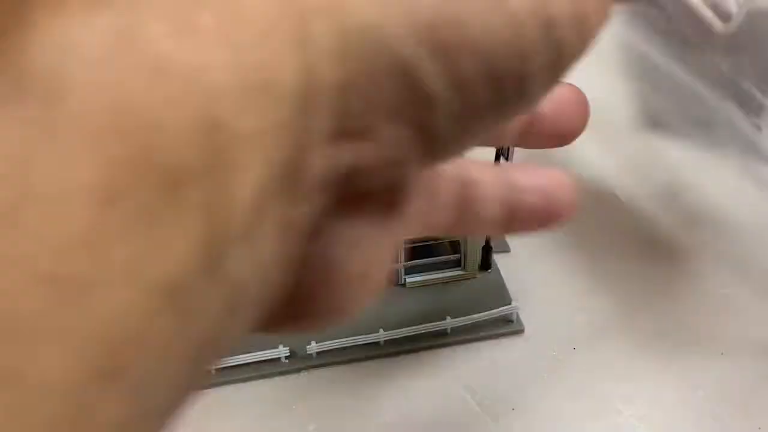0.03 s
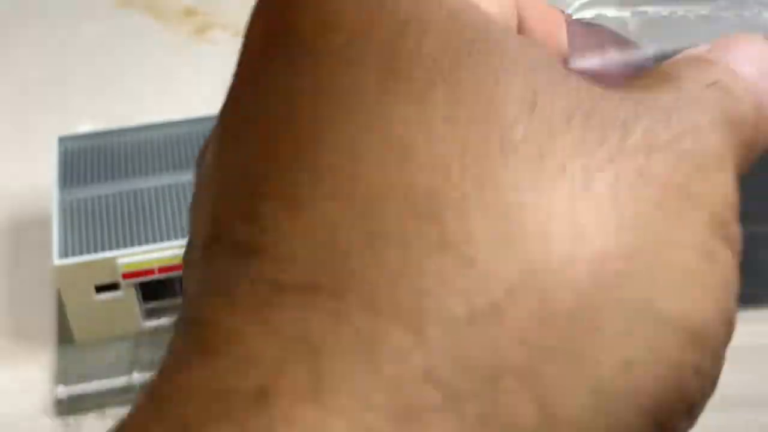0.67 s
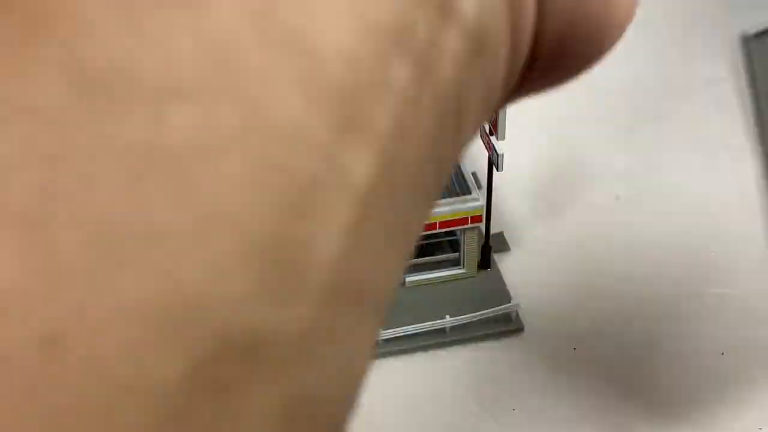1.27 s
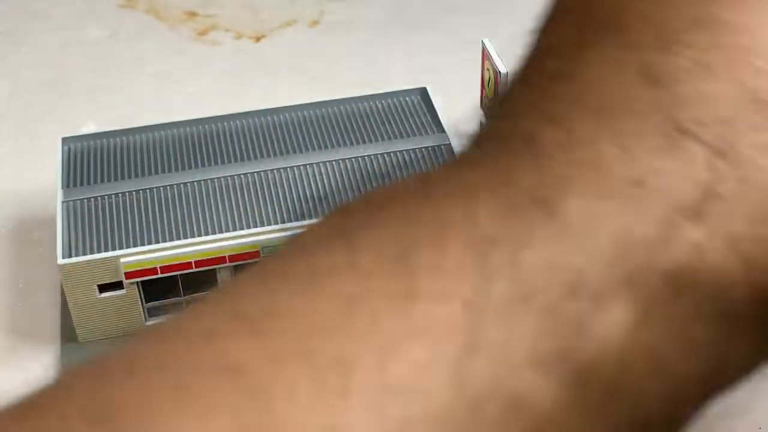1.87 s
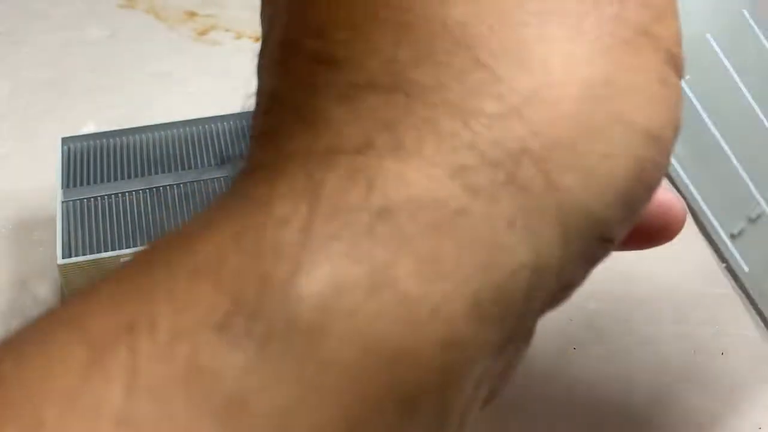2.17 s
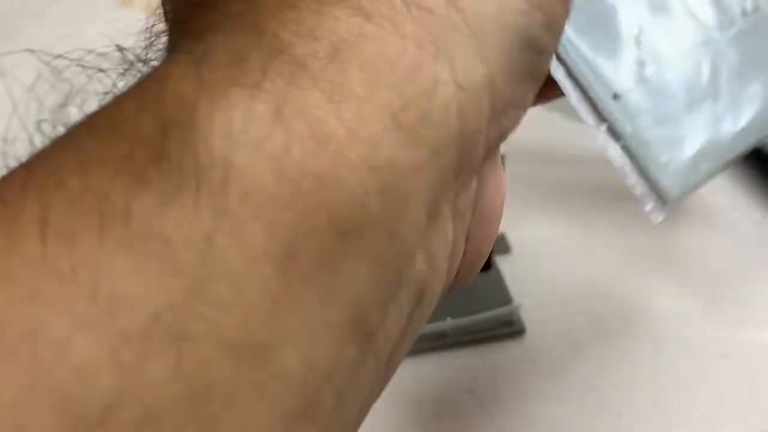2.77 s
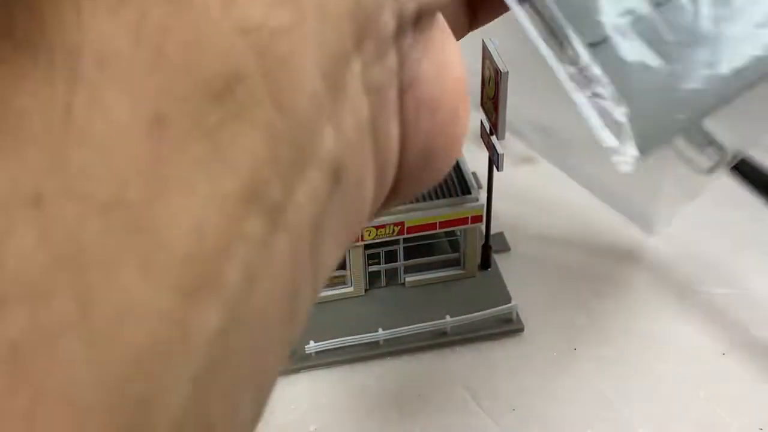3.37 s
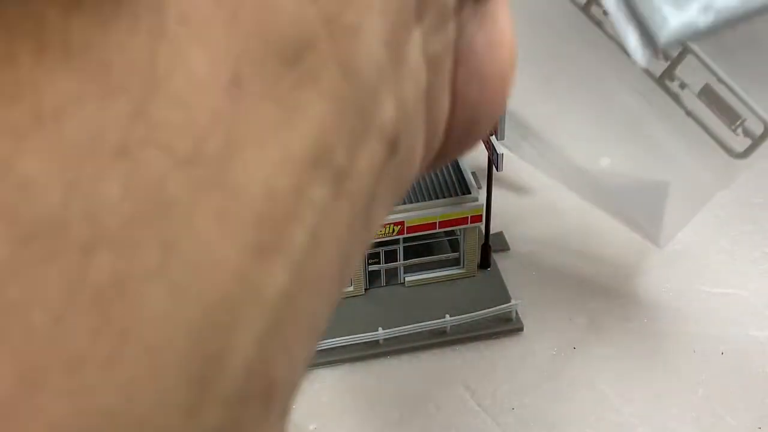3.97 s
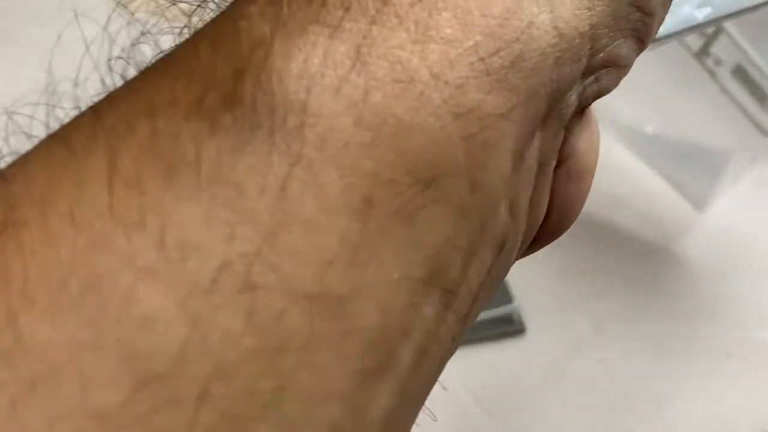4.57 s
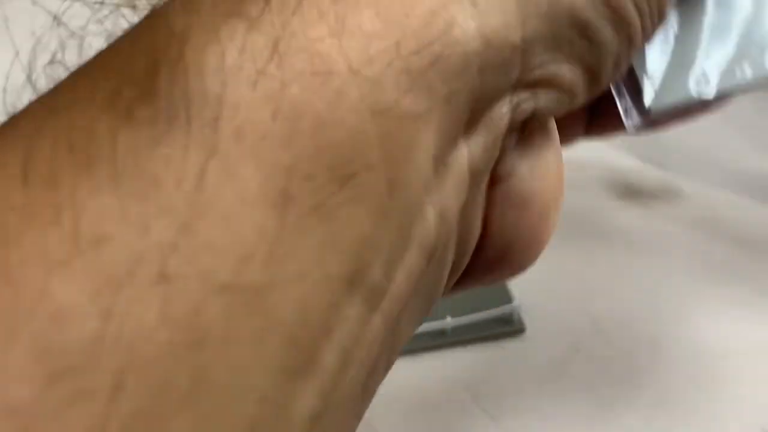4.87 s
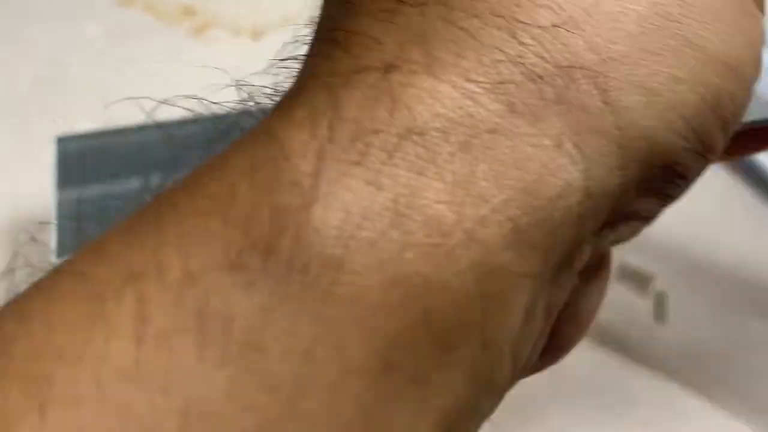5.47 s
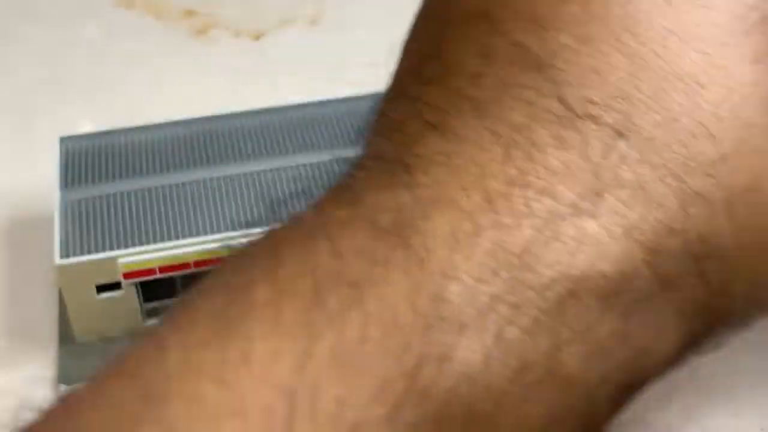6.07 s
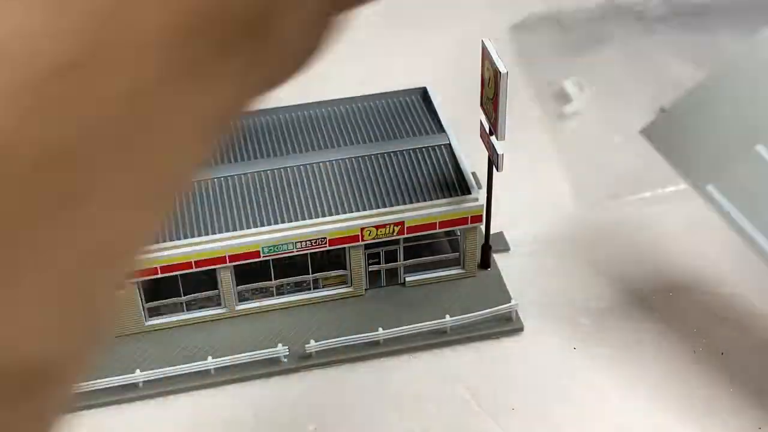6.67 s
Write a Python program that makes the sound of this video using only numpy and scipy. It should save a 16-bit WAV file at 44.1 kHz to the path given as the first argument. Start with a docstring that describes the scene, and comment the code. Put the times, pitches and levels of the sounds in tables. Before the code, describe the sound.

Thin plastic bags crinkle and snap in a hand, small parts tapping inside, with a few dull bumps against the microphone stand.

```python
"""Thin plastic bags of model parts rustle and snap as a hand lifts, turns and puts them down.
Creases flip in the film; the parts inside slide, tap each other and thud on the table.
The arm bumps and rubs a camera stand, which carries dull knocks straight to the microphones,
and something small clinks. A small, quiet room surrounds it."""
import sys
import numpy as np
from scipy import signal
from scipy.fft import rfft, irfft, next_fast_len
from scipy.io import wavfile
from scipy.ndimage import uniform_filter1d, minimum_filter1d, map_coordinates

SR = 44100
rng = np.random.default_rng(int(sys.argv[2]) if len(sys.argv) > 2 else 0)


def master(y):
    """Save y as 16-bit WAV."""
    cut = np.clip(np.atleast_2d(y).T, -1, 1)
    pcm = np.round(cut * 32767)  # scale
    wavfile.write(sys.argv[1], SR, pcm.astype(np.int16))


N = 297234

# distinct snaps of the film (time [s], level [dB], crease pitch [Hz])
SNAP_EVENTS = [(0.154, -26.5, 5430), (0.398, -42, 2560), (0.5601, -29, 4600), (0.609, -28, 3600),
               (0.7545, -30, 2820), (0.832, -18.5, 11400), (0.8987, -17.5, 3330), (0.9935, -30.5, 3560),
               (1.0317, -27.5, 3420), (1.1074, -27.5, 16000), (1.1727, -14, 5100), (1.3748, -27.5, 4080),
               (1.4845, -29, 3400), (1.511, -22.5, 3950), (1.657, -12.5, 10400), (1.6933, -24.5, 11100),
               (1.767, -32, 4330), (1.8723, -23.5, 3630), (1.8886, -15.5, 5440), (1.9995, -19.5, 3770),
               (2.0577, -16.5, 15400), (2.4977, -16.5, 8050), (2.6226, -19, 4500), (3.5063, -26.5, 15070),
               (3.6284, -32, 3940), (3.9544, -45.5, 4380), (4.2034, -36.5, 4110), (4.7486, -24, 15180),
               (5.0511, -22.5, 3620), (5.1447, -17, 10600), (5.1935, -22.5, 9100), (5.257, -17, 2900),
               (5.4811, -19.5, 15200), (5.8851, -11.5, 11500), (5.9322, -12.5, 11100), (5.9704, -21, 10500),
               (6.0427, -22, 7010), (6.2123, -9.5, 6450), (6.2836, -17, 11500), (6.3421, -15.5, 15300),
               (6.359, -13.5, 15700), (6.389, -11.5, 2920), (6.4824, -19, 11800), (6.5717, -32, 15100)]
# finger strokes on the bag (start [s], end [s], film crinkle [dB], sliding parts [dB])
FINGER_STROKES = [(0, 0.057, -45.5, -45), (0.151, 0.24, -53.5, -52), (0.516, 0.608, -54.5, -47),
                  (0.672, 0.71, -50, -56.5), (0.755, 0.88, -51, -53), (0.888, 1.03, -50, -51.5),
                  (1.14, 1.213, -50.5, -60), (1.253, 1.367, -47, -56), (1.628, 1.711, -57, -56),
                  (1.824, 1.882, -40, -53), (2.205, 2.254, -51.5, -53.5), (2.321, 2.391, -61, -52.5),
                  (2.4, 2.458, -48, -49), (2.505, 2.728, -56.5, -51), (2.83, 2.9, -45.5, -43),
                  (2.985, 3.15, -51, -50.5), (3.17, 3.24, -54, -52), (3.306, 3.311, -45.5, -43.5),
                  (3.437, 3.587, -59.5, -59.5), (4.098, 4.29, -63, -67.5), (4.286, 4.341, -47.5, -59),
                  (4.722, 4.84, -47.5, -55.5), (4.912, 5.017, -41, -47), (5.251, 5.3, -39, -46),
                  (5.358, 5.519, -44.5, -49), (5.58, 5.843, -54.5, -56), (5.888, 5.981, -48.5, -65),
                  (6.024, 6.134, -44.5, -49.5), (6.163, 6.31, -38.5, -54.5), (6.332, 6.447, -33.5, -44.5),
                  (6.585, 6.734, -56.5, -53.5)]
# spectrum of the wide film (frequency [Hz], level [dB])
FILM_SPECTRUM = [(60, -20.5), (300, -6.5), (700, 0.5), (900, -4), (1300, 3), (1700, -6), (2200, -5),
                 (3000, -6), (5000, -12.5), (16000, -47.5)]


def amp(db):
    """Decibels to gain."""
    return np.exp(np.asarray(db) * (np.log(10) / 20))


def unit(x):
    """Scale to rms 1."""
    return x / np.sqrt(np.mean(x ** 2) + 1e-20)


def along(points, hz):
    """Interpolate (Hz, value) points on a log axis."""
    f, v = np.transpose(points)
    return np.interp(np.log(hz + 1), np.log(f + 1), v)


def fade(t, t60_s):
    """Decay of 60 dB per t60_s."""
    return np.exp(-np.log(1000) * t / t60_s)


def panned(db):
    """Left and right gains for a level difference."""
    return amp(np.array([np.atleast_1d(db), -np.atleast_1d(db)]) / 2)


def add(track, s, sound):
    """Mix a sound into the track at s seconds."""
    start = max(round(s * SR), 0)
    track[:, start:start + sound.shape[-1]] += sound[..., :N - start]


def wobble(knots_per_s):
    """Smooth random curve."""
    knots = rng.standard_normal(int(N * knots_per_s / SR) + 4)
    return map_coordinates(knots, [np.arange(N) * knots_per_s / SR])


def filtered(x, response):
    """Apply a complex frequency response."""
    n = x.shape[-1]
    m = next_fast_len(n + min(n // 4, SR // 4))
    return irfft(rfft(x, m) * response(np.fft.rfftfreq(m, 1 / SR)), m)[..., :n]


def coloured(x, spectrum, size=4096):
    """Minimum-phase filter that keeps the power of white noise."""
    cepstrum = irfft(np.log(amp(along(spectrum, np.fft.rfftfreq(size, 1 / SR)))))
    cepstrum[1:size // 2] *= 2
    cepstrum[size // 2 + 1:] = 0
    pulse = irfft(np.exp(rfft(cepstrum)))
    return signal.fftconvolve(x, pulse[None] / np.linalg.norm(pulse), axes=1)[:, :x.shape[-1]]


def diffuse(size):
    """White stereo noise, correlated at the two microphone ports like sound from all sides."""
    # (frequency [Hz], port coherence before clipping [ratio])
    coherence = [(60, 1), (600, 1), (1500, 0.78), (3500, 0.31), (8000, -0.66), (12500, 2), (16000, 8.7)]

    def mid_side(hz):
        angle = np.arccos(np.clip(along(coherence, hz), -1, 1)) / 2
        return np.array([np.cos(angle), np.sin(angle)])

    mid, side = filtered(rng.standard_normal((2, size)), mid_side)
    return np.array([mid + side, mid - side])


def decaying_noise(decay_times, size=SR // 4):
    """Stereo noise with a t60 per frequency."""
    hz, t, bins = signal.stft(diffuse(size), SR, nperseg=256)
    decay = amp(-60 * t / along(decay_times, hz)[:, None])
    return signal.istft(bins * decay, SR, nperseg=256)[1][:, :size]


def ring(modes, t, scatter_db, detune, attack_cycles):
    """Damped modes of randomised strength and pitch; high ones build up first."""
    hz, db, t60_s = np.transpose(modes)[:, :, None]
    strength, shift = rng.standard_normal((2, len(modes), 1))
    attack = 1 - np.exp(-t * hz / attack_cycles)
    envelope = amp(db + scatter_db * strength) * attack * fade(t, t60_s)
    return np.sum(envelope * np.cos(2 * np.pi * hz * (1 + detune * shift) * t), axis=0)


def grains(per_s, spread_db, t60_s):
    """Gain curve of tiny uneven bursts, rms 1."""
    fires = rng.random(N) < per_s / SR
    size = np.minimum(rng.exponential(size=N), 3)
    power = fires * amp(spread_db * size) ** 2
    return unit(np.sqrt(signal.lfilter([1], [1, -fade(2 / SR, t60_s)], power)))


def stroke(length_s, rise_s=.012, t60_s=.2, arch_db=1):
    """Gain of one movement: sets in, is fastest halfway, dies away."""
    t = np.arange(SR // 2) / SR
    speed = np.sin(np.pi * np.minimum(t / max(length_s, rise_s), 1))
    release = fade(np.maximum(t - length_s, 0), t60_s)
    return np.minimum(t / rise_s, 1) * amp(arch_db * (speed - 1.5)) * release


def room_tone():
    """Faint, low rush of the room's air."""
    # (frequency [Hz], level [dB])
    air_spectrum = [(15, -47), (25, -36), (87, -1.5), (120, -7.5), (175, -9), (326, -15), (373, -9.5),
                    (607, -22), (962, -18.5), (3340, -34), (5880, -33.5), (8360, -37), (16000, -37)]
    return amp(-59 + .48 * wobble(3.8)) * unit(coloured(diffuse(N), air_spectrum))


def reflections(x):
    """Short reverberation from table and walls."""
    # (frequency [Hz], t60 [s])
    room_decay = [(100, 0.54), (1000, 0.21), (6000, 0.17), (16000, 0.12)]
    tail = np.pad(decaying_noise(room_decay), ((0, 0), (SR // 300, 0)))
    return signal.fftconvolve(x, tail / np.linalg.norm(tail[0]), axes=1)[:, :N]


def clinks(t60_s=.1):
    """Something small and hard rings with one thin tone as the arm reaches the stand."""
    # (time [s], level [dB], pitch [Hz])
    clink_events = [(2.604, -34, 1970), (2.622, -42.5, 4580), (2.867, -44, 4400)]
    out = np.zeros((2, N))
    t = np.arange(SR // 4) / SR
    for s, db, hz in clink_events:
        add(out, s, amp(db) * np.sin(2 * np.pi * hz * t) * fade(t, t60_s))
    return out


def arm_rub():
    """Skin sticks and slips along the stand in a hollow scrape."""
    # (start [s], end [s], level [dB])
    rub_events = [(2.61, 2.74, -28), (2.82, 2.92, -38.5), (2.978, 3.2, -32), (3.205, 3.32, -49)]
    # (frequency [Hz], level [dB])
    skin_spectrum = [(30, -40), (80, -8.5), (130, -7), (200, -8), (260, -7.5), (370, 2.5), (600, -8.5),
                     (900, -45.5), (1700, -23.5), (4000, -33)]
    slips = grains(per_s=220, spread_db=2.5, t60_s=.04)
    pressure = np.zeros((1, N))
    for start, end, db in rub_events:
        add(pressure, start, amp(db) * stroke(end - start, rise_s=.025, t60_s=.52, arch_db=8.5))
    return pressure * unit(coloured(diffuse(N) * slips, skin_spectrum))


def stand_knocks(rebound_cutoff_ratio=1.28, min_rebound_s=.002):
    """Each bump cracks, rings the stand and rattles its joints; soft contacts leave only low modes."""
    # arm on stand (time [s], force [dB], contact cutoff [Hz], rebound delay [s])
    bumps = [(0.001, -15.5, 1700, 0.0048), (0.021, -15, 1600, 0.0015), (0.113, -17.5, 108, 0),
             (0.239, -18, 132, 0), (1.259, -37.5, 353, 0), (2.603, -29.5, 496, 0.00088),
             (2.684, -11, 1305, 0.0063), (2.709, -18.5, 1560, 0.00017), (2.869, -26, 644, 0),
             (2.899, -20.5, 322, 0), (3.057, -31.5, 560, 0), (3.147, -23, 570, 0), (3.247, -24, 274, 0),
             (5.252, -7.5, 570, 0.0067), (5.278, -6.5, 1140, .013), (5.326, -19.5, 586, 0.00019),
             (6.397, -36.5, 892, 0)]
    # (frequency [Hz], level [dB], t60 [s])
    stand_modes = [(79.4, -19.5, 0.37), (123.7, -13, 0.21), (151.9, -7.5, 0.17), (197, -4.5, 0.2),
                   (300, -11, 0.066), (350, -1.5, 0.12), (368, -3, 0.069), (438.5, -8.5, 0.077),
                   (455.6, -11, 0.085), (588.5, -12, 0.14), (734.7, -10, 0.11), (773, -7.5, 0.086),
                   (828, -13, .09), (882, -12.5, 0.045), (1007, -9.5, 0.074), (1123, -12.5, 0.11),
                   (1198, -18, 0.13), (1340, -28, 0.09), (1715, -20.5, 0.17), (1954, -24, 0.076),
                   (2940, -25.5, .04)]
    # joint rattle (frequency [Hz], level [dB])
    rattle_spectrum = [(30, -63.5), (100, -20), (200, 6.5), (400, 3), (550, -9), (1100, -7), (1800, -10),
                       (2600, -9.5), (6000, -9), (16000, -25)]
    # joint rattle (frequency [Hz], t60 [s])
    rattle_decay = [(100, 0.26), (500, 0.15), (1500, 0.12), (5000, 0.026)]
    # contact crack (frequency [Hz], level [dB])
    impact_spectrum = [(100, -18.5), (400, -3), (1000, -1.5), (2000, -7), (3500, -24), (8000, -21)]
    touches = [(s, db, hz) for s, db, hz, _ in bumps]
    rebounds = [(s + delay_s, db, hz * rebound_cutoff_ratio)
                for s, db, hz, delay_s in bumps if delay_s > min_rebound_s]
    out = np.zeros((2, N))
    t = np.arange(SR // 4) / SR
    for s, db, cutoff_hz in touches + rebounds:
        modes = ring(stand_modes, t, scatter_db=1.2, detune=.003, attack_cycles=.5)
        rattle = amp(-4) * coloured(decaying_noise(rattle_decay), rattle_spectrum)
        impact = amp(2) * coloured(diffuse(len(t)) * fade(t, .012), impact_spectrum)
        contact = signal.butter(2, cutoff_hz, fs=SR)
        add(out, s, amp(db) * signal.lfilter(*contact, impact + modes + rattle))
    # high-pass softens the knocks' onset peak and removes DC thump
    return signal.lfilter(*signal.butter(2, 90, "high", fs=SR), out)


def part_taps(typical_tap_db=-29):
    """Light parts clack, the bag rattles around them, the table thuds below."""
    # (time [s], level [dB])
    tap_events = [(0.071, -22), (0.229, -23.5), (0.346, -45), (0.398, -31), (0.521, -36), (0.597, -27),
                  (0.622, -33), (0.903, -35), (1.102, -37), (1.171, -28.5), (1.311, -33), (1.377, -29.5),
                  (1.486, -29), (1.512, -23.5), (2.0, -29.5), (2.074, -26.5), (2.142, -36.5),
                  (2.442, -30.5), (3.508, -30), (4.941, -30), (5.477, -19), (6.303, -24), (6.342, -20),
                  (6.395, -16), (6.482, -25), (6.722, -26.5)]
    # (frequency [Hz], level [dB], t60 [s])
    part_modes = [(690, -5, .04), (930, -8, .03), (1190, -2, .04), (1380, -2, .035), (1620, 0, .055),
                  (1900, -6, .035), (2750, -7, .025)]
    # (frequency [Hz], level [dB])
    thud_spectrum = [(30, -25), (90, -5.5), (200, -1), (420, -2), (700, -18.5), (1500, -10), (5000, -63.5)]
    clack, rattle, thud = np.zeros((3, 2, N))
    t = np.arange(SR // 10) / SR
    for s, db in tap_events:
        modes = ring(part_modes, t, scatter_db=2.5, detune=.035, attack_cycles=.4)
        add(clack, s, amp(db - 12) * modes)
        add(rattle, s, amp(db - 9.5) * diffuse(len(t)) * fade(t, .031))
        thud_db = -40 + .71 * (db - typical_tap_db)
        add(thud, s, amp(thud_db) * diffuse(len(t)) * fade(t, .077))
    return clack + coloured(rattle, FILM_SPECTRUM) + coloured(thud, thud_spectrum)


def film_response_db(snap_db, crease_hz, typical_db=-22, typical_hz=5000):
    """The wide film answers strong snaps more, small high creases less."""
    return -30 + .59 * (snap_db - typical_db) - 4 * np.log2(crease_hz / typical_hz)


def micro_creases(spread_db, cycles, count=1100, size=256, low_hz=1700, high_hz=15500):
    """Scattered pings, each a few cycles at its own pitch and place; rms 1."""
    when, pitch, strength, place = rng.random((4, count, 1))
    hz = low_hz * (high_hz / low_hz) ** pitch
    t = np.arange(size) / SR
    loudness = amp(spread_db * np.minimum(-np.log(1 - strength), 3))
    pings = loudness * np.sqrt(hz) * np.sin(2 * np.pi * hz * t) * fade(t, cycles / hz)
    index = ((when * (N - size)).astype(int) + np.arange(size)).ravel()
    channels = [np.bincount(index, (pings * gain).ravel(), N) for gain in panned(12 * (place - .5))]
    return unit(np.array(channels))


def bag_rustle(strain_lead_s=.0088, jerk_db=1.5, jerks_per_s=20, split_hz=6000):
    """In each stroke and around each snap, tiny creases give way and parts slide over the film."""
    # (frequency [Hz], level [dB])
    crinkle_spectrum = [(200, -48.5), (1200, -13), (2100, -3), (3000, 0.5), (4800, 1), (7000, 0.5),
                        (9000, -1), (12000, 2), (15500, 3), (16400, -2.5)]
    # (frequency [Hz], level [dB])
    slide_spectrum = [(40, -13.5), (120, -2), (300, -2), (700, -4), (900, -6), (1250, -2.5), (1650, -1),
                      (2100, -11.5), (4000, -10.5), (16000, -41.5)]
    gains = np.zeros((2, N))  # rows: crinkle, slide
    for start, end, crinkle_db, slide_db in FINGER_STROKES:
        add(gains, start - .005, amp([[crinkle_db], [slide_db]]) * stroke(end - start))
    settling = amp([[-26], [-24]]) * stroke(length_s=.019)
    for s, db, hz in SNAP_EVENTS:
        add(gains, s - strain_lead_s, amp(film_response_db(db, hz)) * settling)
    crinkle_gain, slide_gain = gains * amp(jerk_db * wobble(jerks_per_s))
    creases = grains(per_s=380, spread_db=6, t60_s=.008)
    crinkle = unit(coloured(diffuse(N) * (creases + amp(-3)), crinkle_spectrum))
    crinkle = unit(crinkle + amp(-3) * micro_creases(spread_db=6, cycles=9))
    # bending shifts the sound between low creases and high fizz
    low = filtered(crinkle, lambda hz: 1 / (1 + (hz / split_hz) ** 4))
    bend_db = 2 * wobble(16)
    crinkle = low * amp(bend_db) + (crinkle - low) * amp(-bend_db)
    scrapes = grains(per_s=200, spread_db=2.5, t60_s=.04)
    slide = unit(coloured(diffuse(N) * (creases + scrapes), slide_spectrum))
    return amp(-.4) * crinkle_gain * crinkle + amp(.7) * slide_gain * slide


def stray_snaps(count=8, per_s=12, low_hz=3000, high_hz=10840):
    """Small creases flip by chance in a stroke: (time [s], level [dB], pitch [Hz], film level [dB])."""
    rows = []
    for start, end, crinkle_db, slide_db in FINGER_STROKES:
        wait, size, pitch = rng.random((3, count))
        times_s = start + (np.arange(count) + wait) / per_s
        pitches_hz = low_hz * (high_hz / low_hz) ** pitch
        boosts_db = 10 + 8 * (size - .5)
        rows += [(s, crinkle_db + db, hz, slide_db + db)
                 for s, db, hz in zip(times_s, boosts_db, pitches_hz) if s < end]
    return rows


def bag_snaps():
    """A crease flips with a crack and a brief pitched ring; the wide film answers lower."""
    crack, ping, film = np.zeros((3, 2, N))
    t = np.arange(SR // 20) / SR
    crack_decay = fade(t, .0049) + amp(-11.5) * fade(t, .085)
    distinct = [(s, db, hz, film_response_db(db, hz)) for s, db, hz in SNAP_EVENTS]
    for s, db, hz, film_db in distinct + stray_snaps():
        place = panned(4.1 * rng.standard_normal())
        add(crack, s + .001, amp(db - 7.5) * place * diffuse(len(t)) * crack_decay)
        resonance = signal.iirpeak(hz, Q=4, fs=SR)
        crease = unit(signal.lfilter(*resonance, diffuse(len(t))))
        add(ping, s + .001, amp(db - 9) * place * crease * fade(t, .014))
        add(film, s + .001002, amp(film_db - 10.5) * diffuse(len(t)) * fade(t, .041))
    # (frequency [Hz], level [dB])
    crack_spectrum = [(200, -63), (1500, -44.5), (2300, -14), (3300, -2), (5000, 0.5), (7000, 2),
                      (9000, -0.5), (11500, 3), (15000, 6), (17000, -9.5)]
    return coloured(crack, crack_spectrum) + ping + coloured(film, FILM_SPECTRUM)


def scene():
    """Bag and parts sound through the air, the stand through its own body."""
    # (frequency [Hz], left minus right [dB])
    stand_balance = [(60, 0.5), (200, 4), (380, -2), (1000, 2)]
    stand = filtered(stand_knocks() + arm_rub(), lambda hz: panned(along(stand_balance, hz)))
    air = room_tone()
    airborne = bag_rustle() + part_taps() + clinks() + bag_snaps()
    return airborne + amp(-10.5) * reflections(airborne) + stand + air


def limited(x, ceiling, size=220):
    """Duck briefly around peaks above the ceiling."""
    needed = np.minimum(1, ceiling / (np.abs(x).max(axis=0) + 1e-9))
    return x * uniform_filter1d(minimum_filter1d(needed, size), size // 2)


def record(dry):
    """Two microphone ports differing in level and phase, then peak limiter and band limit."""
    # (frequency [Hz], left minus right [dB])
    port_balance = [(100, 0.5), (700, 0), (1300, 3.5), (2400, 4), (4400, 1), (8000, -2), (15000, 1)]
    # (frequency [Hz], left lead [rad])
    port_phase = [(100, 0), (340, .35), (2500, -.1), (4300, .8), (6000, .9), (8000, 1.4), (9600, .1),
                  (10500, -.6), (13200, -3.1), (16000, -5.3)]

    def ports(hz):
        phase_rad = np.array([[.5], [-.5]]) * along(port_phase, hz)
        return panned(along(port_balance, hz)) * np.exp(1j * phase_rad)

    held = limited(filtered(dry, ports), ceiling=.93)
    return filtered(held, lambda hz: hz < 16200)


dry = scene()
out = record(dry)
master(out)
```